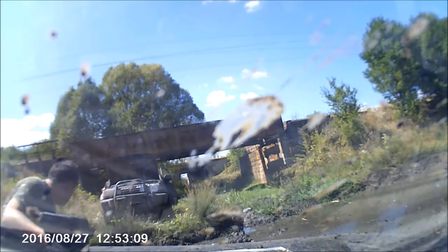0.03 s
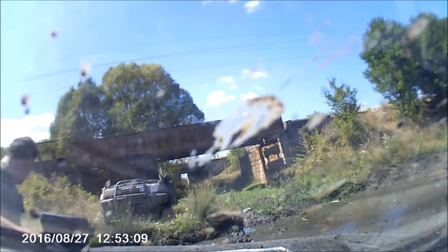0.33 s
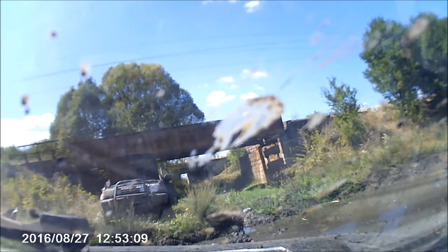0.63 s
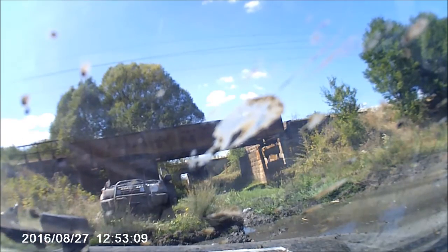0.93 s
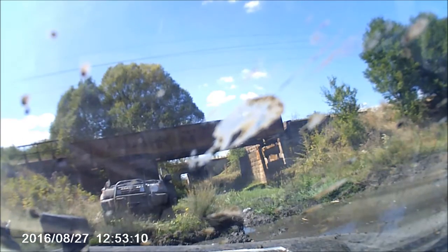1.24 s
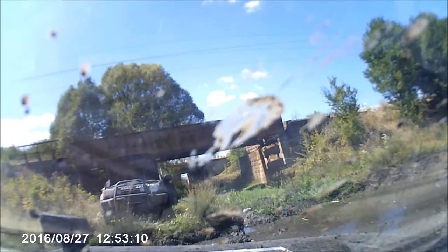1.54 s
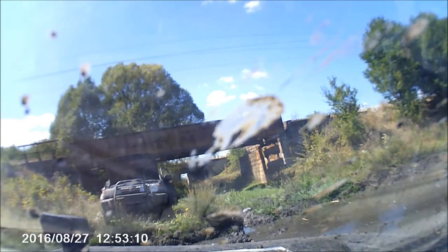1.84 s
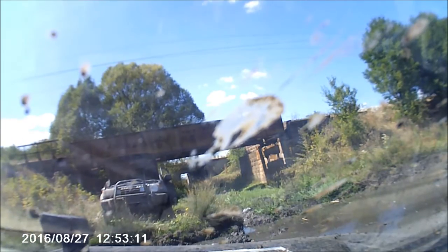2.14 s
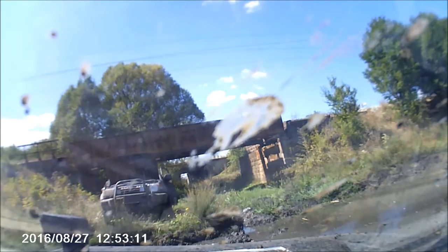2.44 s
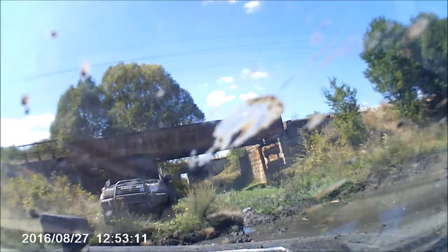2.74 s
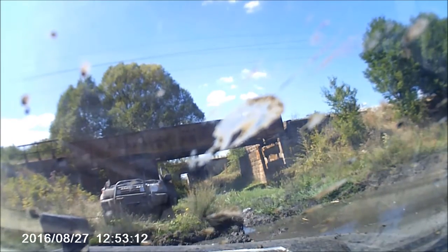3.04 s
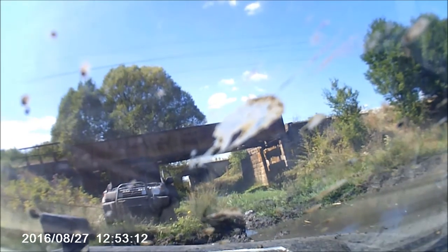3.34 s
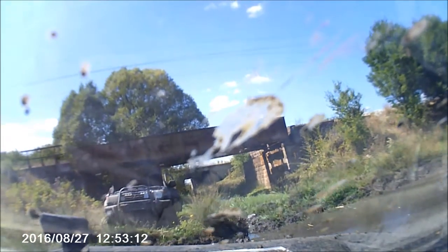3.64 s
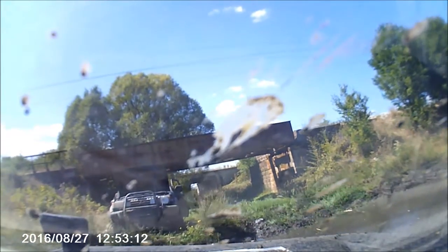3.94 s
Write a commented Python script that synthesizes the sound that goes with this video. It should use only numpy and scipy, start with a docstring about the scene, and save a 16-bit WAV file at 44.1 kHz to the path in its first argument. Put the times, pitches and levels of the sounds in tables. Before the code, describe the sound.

An off-road vehicle's engine idles with a low, uneven rumble and thin whine, heard inside the cabin. A faint hum stops at 1 second. Clicks and tiny squeals come and go, the body groans briefly at 1.6 seconds, and trim knocks around 2.3. Near 3 seconds the engine revs up loudly, peaking around 3.6 with gear whine and light crackle, then eases slightly amid more knocks.

```python
"""An off-road vehicle's four-cylinder engine, heard from inside the cabin.
It idles with an odd weak firing: the cabin booms with the firing orders, belt-driven parts whine,
and a hum stops after a second. Between clicks and thin squeals the body groans, then something knocks.
Near three seconds the engine revs up and pulls away, with gear whine and a crackle at top revs.
More knocks land near the end, and the microphone overloads slightly on the loudest peaks."""
import sys
import numpy as np
from scipy import signal
from scipy.fft import rfft, irfft
from scipy.io import wavfile

SR = 44100
rng = np.random.default_rng(int(sys.argv[2]) if len(sys.argv) > 2 else 0)


def unload_audio(sound):
    """Save the sound as a 16-bit wav file, at the path given as the first command line argument."""
    columns = np.transpose(np.atleast_2d(sound))
    # keep every value between -1 and 1, then stretch to whole-number steps
    steps = np.round(np.clip(columns, -1, 1) * 32767)
    wavfile.write(sys.argv[1], SR, steps.astype(np.int16))


N = 176400
TIME = np.arange(N) / SR
IDLE_RATE, FULL_RATE = 26, 58  # firings per second

# engine load (time [s], boom gain [dB], extra gain of upper orders [dB], clatter gain [dB])
LOAD = [(0, -29, -19.5, 1), (1.4, -29.5, -19, 1.5), (2, -28, -18, 1.5), (2.75, -27, -18, 1),
        (2.92, -22.5, -23, 3.5), (3.02, -20, -16, 5), (3.12, -16, -9.5, 9), (3.2, -15.5, 6.5, 12.5),
        (3.32, -12.5, 1.5, 14), (3.5, -8, -0.5, 16.5), (3.76, -9.5, 0, 16.5), (3.87, -9, 2, 16.5),
        (4, -9.5, 2.5, 20)]


def boom(rate, turns, effort):
    """Firing orders ring exhaust and cabin; load lifts the upper ones, uneven firings make idle lumpy."""
    # response of exhaust and cabin (frequency [Hz], gain [dB])
    cabin = [(26, -20), (36, 5), (52, 2.5), (67, 0), (80, -9), (106, -2), (134, -6.5), (170, -7),
             (200, -20.5), (225, -23), (266, -10), (290, -14), (340, -22), (400, -37), (475, -29),
             (620, -42), (1200, -59)]
    # weak firings at idle (time [s], push lost [fraction])
    misfires = [(.38, .3), (.448, .65), (.76, .5), (1.068, .75), (1.375, .3), (2.125, .85), (2.35, .5)]
    upper_from_hz, upper_full_hz, half_order_db, misfire_s = 114.4, 187, -27, .02
    # the resonances delay each order: minimum phase, slightly exaggerated
    grid_hz = np.arange(SR // 2 + 1)
    log_gain = np.log(amp(read(cabin, grid_hz)))
    lag = -1.15 * signal.hilbert(np.r_[log_gain, log_gain[-2:0:-1]]).imag[:len(grid_hz)]
    upper_db, out = curve(LOAD, axis=2), np.zeros(N)
    for order in np.arange(2, 29) / 2:
        hz = order * rate
        upper = ramp(hz, upper_from_hz, upper_full_hz)
        shake = 1 + (.045 + .097 * upper) * wander(rate_hz=28)
        gain = amp(read(cabin, hz) + upper * upper_db) * shake
        if order % 1:
            gain *= amp(half_order_db + 10.7 * upper)
        out -= gain * np.cos(2 * np.pi * order * turns + np.interp(hz, grid_hz, lag))
    push = 1 - sum(lost * np.exp(-((TIME - s) / misfire_s) ** 2) for s, lost in misfires)
    lumps = 1 + .13 * (1 - effort) * wander(rate_hz=16)
    return np.sqrt(2) * out * push * lumps * amp(curve(LOAD, axis=1))


def clatter(turns, effort):
    """Valve and intake noise, pulsing with each firing."""
    # noise colour at idle and under load (frequency [Hz], relative level [dB])
    idle_colour = [(20, 1), (130, 1), (205, -2), (275, -1), (430, -6), (600, -7.5), (950, -12), (1220, -10),
                   (1500, -16.5), (1800, -19), (2300, -24.5), (2900, -22.5), (3400, -30), (7000, -34),
                   (8000, -38), (10500, -41)]
    load_colour = [(20, 12.5), (130, 8), (280, 4), (450, -0.5), (650, -5), (900, -8), (1300, -17.5),
                   (1750, -19), (2200, -32), (3000, -23.5), (3700, -35), (7000, -33.5), (8000, -42),
                   (10500, -43.5)]
    idle = np.sqrt(1 - effort) * amp(-47) * noise(idle_colour)
    loaded = np.sqrt(effort) * amp(-42) * noise(load_colour)
    pulsing = 1 + .15 * np.cos(2 * np.pi * turns) + .12 * wander(rate_hz=28)
    return (idle + loaded) * pulsing * amp(curve(LOAD, axis=3))


def whines(rate, turns, effort):
    """The alternator sings throughout; the idle's tones fade as the revs rise and the gears take over."""
    # alternator fader (time [s], level [dB])
    alternator_level = [(0, -52.5), (1.1, -52.5), (2, -52.5), (2.8, -56.5), (3.05, -60), (3.28, -50),
                        (3.41, -43), (3.48, -56), (3.55, -62.5), (3.75, -49), (3.88, -46.5), (4, -45.5)]
    # thin tones at idle, gear tones under load (pitch [x firing rate], full level [dB])
    idle_tones = [(10, -51), (23.1, -59), (26.8, -65.5), (49.6, -64.5), (63.9, -64), (73.4, -72.5),
                  (82, -72.5), (100.5, -72.5), (108.6, -74.5), (151, -81)]
    gear_tones = [(13.3, -48), (17.3, -59), (43.5, -70), (80, -74.5)]
    alternator_ratio, idle_fade_hz = 19.8, 8.9
    idling = 1 - ramp(rate, IDLE_RATE, IDLE_RATE + idle_fade_hz)
    idle = sum(amp(db) * whine(multiple * turns) for multiple, db in idle_tones)
    gears = sum(amp(db) * whine(multiple * turns) for multiple, db in gear_tones)
    alternator = amp(curve(alternator_level)) * whine(alternator_ratio * turns)
    return alternator + idling * idle + np.sqrt(effort) * gears


def whine(cycles):
    """A spinning part's thin tone, wavering in pitch and level."""
    drift = np.cumsum(3 * wander(rate_hz=32)) / SR
    waver = 1 + .36 * wander(rate_hz=20.7)
    return np.sqrt(2) * waver * np.sin(2 * np.pi * (cycles + drift))


def trim():
    """Sharp clicks and dull knocks on the cabin's trim."""
    # hits (time [s], level [dB], decay [s], treble lift [dB])
    clicks = [(.536, -47, 0.0072, 3), (.550, -35.5, 0.0063, -1), (2.213, -30, 0.011, -19),
              (2.387, -44.5, 0.0063, 2), (3.782, -39, 0.0054, 2), (3.801, -47.5, 0.019, 26),
              (3.86, -33, 0.0052, -12), (3.878, -34, 0.0071, -6.5), (3.949, -40, .005, 1)]
    knocks = [(0.553, -46, .005, 16), (2.216, -24.5, 0.034, -11), (2.238, -18.5, 0.02, -27),
              (2.287, -34.5, 0.035, 4.5), (2.395, -26.5, 0.0065, -1), (2.405, -27, 0.011, -1.5),
              (3.8, -20, 0.014, 1), (3.845, -21.5, .04, -6.5), (3.864, -25.5, 0.036, 9.5)]
    # their colours (frequency [Hz], relative level [dB])
    click_colour = [(100, -12), (600, 14.5), (1400, 1), (2300, -1), (5300, -4), (6300, -11.5),
                    (9500, -11.5), (11000, -32.5)]
    knock_colour = [(50, -12), (150, -8.5), (300, -0.5), (410, -1), (600, -12), (900, -11.5), (1300, -16.5),
                    (2000, -33), (3500, -38), (9000, -64.5)]
    out = np.zeros(N)
    for s, db, decay, treble_db in clicks:
        add(out, s, hit(click_colour, db, decay, treble_db, treble_hz=5000, rise_s=.0021))
    for s, db, decay, treble_db in knocks:
        add(out, s, hit(knock_colour, db, decay, treble_db, treble_hz=600, rise_s=.0027))
    return out


def hit(colour, db, decay_s, treble_db, treble_hz, rise_s):
    """A blow on damped trim: a dense ring with a fast attack and a short tail."""
    t = np.arange(SR // 4) / SR
    envelope = np.minimum(t / rise_s, 1) * np.exp(-np.maximum(t - rise_s, 0) / decay_s)
    return amp(db) * envelope * noise(colour, len(t), treble_db, treble_hz)


def peak_ticks(rate, turns):
    """Near top revs a short overload-like crackle ticks once per firing, unevenly."""
    # colour of the ticks (frequency [Hz], relative level [dB])
    colour = [(200, -9.5), (700, 2.5), (1500, -3.5), (2600, -15), (4000, -22), (7000, -33), (10500, -33.5)]
    delay_firings, decay_firings, spread_db = .19, .077, 2.5
    firing, since = np.divmod(turns - delay_firings + 1, 1)
    strength = amp(spread_db * np.clip(rng.standard_normal(N), -2, 2))[firing.astype(int)]
    top_revs = ramp(rate, 62, 64)
    return amp(-38) * top_revs * strength * np.exp(-since / decay_firings) * noise(colour)


def creaks():
    """The body gives a rough falling groan and a few thin squeals."""
    # groan contour (time [s], pitch [Hz], level [dB])
    groan = [(1.5, 383.3, -58), (1.58, 377.4, -36.5), (1.615, 354, -41), (1.65, 333, -33),
             (1.69, 324.6, -43), (1.76, 304, -56)]
    # squeals (time [s], length [s], pitch [Hz], level [dB])
    squeals = [(.585, 0.057, 1190, -51), (1.006, 0.1, 2870, -62.5), (1.423, 0.065, 1194, -53),
               (2.81, 0.073, 2890, -58)]
    hz = curve(groan, axis=1) + 23.6 * wander(rate_hz=85)
    gate = (TIME > groan[0][0]) * (TIME < groan[-1][0])
    roughness = 1 + .38 * wander(rate_hz=87)
    out = amp(curve(groan, axis=2)) * gate * roughness * tone(hz)
    for s, length, pitch, db in squeals:
        swell = np.sin(np.pi * np.clip((TIME - s) / length, 0, 1))
        out += amp(db) * swell * tone(pitch + 20 * wander(rate_hz=160))
    return out


def hum():
    """A faint, wavering hum that cuts out."""
    pitch_hz, level_db, end_s, fade_s = 356.5, -48, 1.09, .095
    fade = 1 - ramp(TIME, end_s - fade_s, end_s)
    waver = 1 + .25 * wander(rate_hz=32)
    return amp(level_db) * fade * waver * tone(pitch_hz + 4 * wander(rate_hz=8.6))


def amp(db):
    """Decibels to gain."""
    return 10 ** (np.asarray(db) / 20)


def unit(x):
    """Scales to rms 1."""
    return x / np.sqrt(np.mean(x ** 2) + 1e-20)


def ramp(x, start, full):
    """A fade from 0 to 1 as x goes from start to full."""
    return np.clip((x - start) / (full - start), 0, 1)


def curve(table, axis=1):
    """One column of a timed table at every sample."""
    table = np.array(table)
    return np.interp(TIME, table[:, 0], table[:, axis])


def read(points, hz):
    """A spectrum in dB at the given frequencies."""
    f, db = np.transpose(points)
    return np.interp(np.log(hz + 1), np.log(f + 1), db)


def tone(hz):
    """A sine of rms 1 that follows a moving pitch."""
    return np.sqrt(2) * np.sin(2 * np.pi * np.cumsum(hz) / SR)


def noise(colour, size=N, treble_db=0, treble_hz=1000):
    """Coloured noise of rms 1, with an optional treble shelf."""
    hz = np.fft.rfftfreq(size, 1 / SR)
    shelf = treble_db * hz ** 2 / (hz ** 2 + treble_hz ** 2)
    return unit(irfft(rfft(rng.standard_normal(size)) * amp(read(colour, hz) + shelf), size))


def wander(rate_hz):
    """Smooth random motion of rms 1."""
    hz = np.fft.rfftfreq(N, 1 / SR)
    return unit(irfft(rfft(rng.standard_normal(N)) / (1 + (hz / rate_hz) ** 4), N))


def add(mix, s, sound):
    """Mixes a sound in at a time."""
    part = mix[round(s * SR):][:len(sound)]
    part += sound[:len(part)]


def scene():
    """The engine's layers ride one rev curve; the cabin adds its small noises."""
    # engine speed (time [s], firing rate [Hz])
    speed = [(0, 26), (.3, 26.4), (.55, 26.1), (.75, 26.2), (1, 26.5), (1.15, 26.15), (1.5, 25.8),
             (1.68, 26.6), (2, 26.95), (2.2, 26.8), (2.45, 26.95), (2.8, 27.5), (2.93, 31.5), (3.22, 55.3),
             (3.33, 61.9), (3.5, 66.7), (3.62, 67.9), (3.76, 66.3), (3.87, 59.8), (4, 55.3)]
    rate = curve(speed)
    turns = .6 + np.cumsum(rate) / SR  # phase: one turn per firing
    effort = ramp(rate, IDLE_RATE, FULL_RATE)
    engine = boom(rate, turns, effort) + whines(rate, turns, effort) + clatter(turns, effort)
    return (engine + peak_ticks(rate, turns) + hum() + creaks() + trim())[None]


def record(dry):
    """The microphone flattens the loudest peaks; a steep low-pass takes off the top."""
    ceiling, hardness, cutoff_hz = .99, 60, 10600
    clipped = dry / (1 + np.abs(dry / ceiling) ** hardness) ** (1 / hardness)
    lowpass = signal.firwin(401, cutoff_hz, window=("kaiser", 8), fs=SR)
    return signal.oaconvolve(clipped, lowpass[None], "same")


dry = scene()
out = record(dry)
unload_audio(out)
```